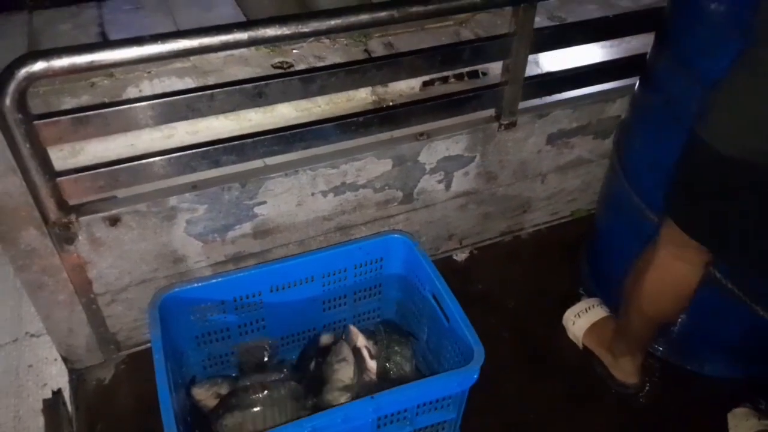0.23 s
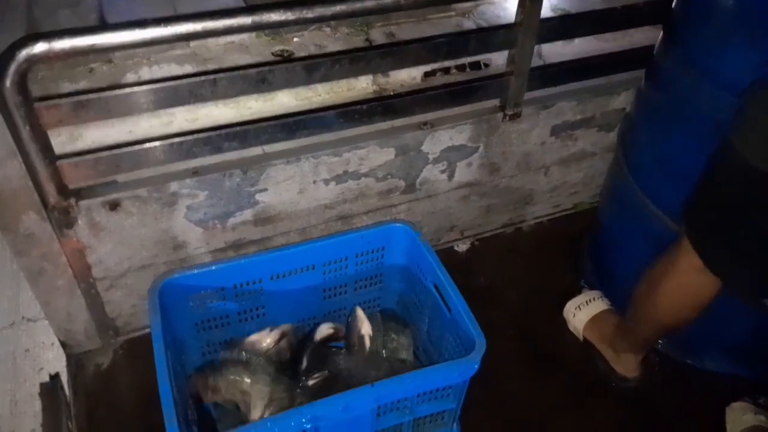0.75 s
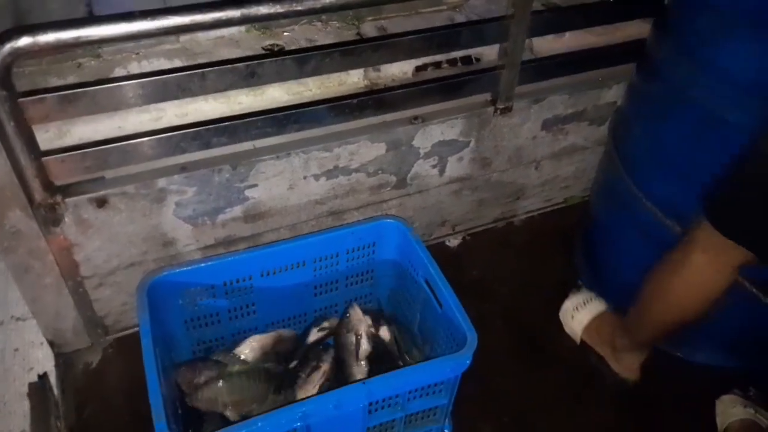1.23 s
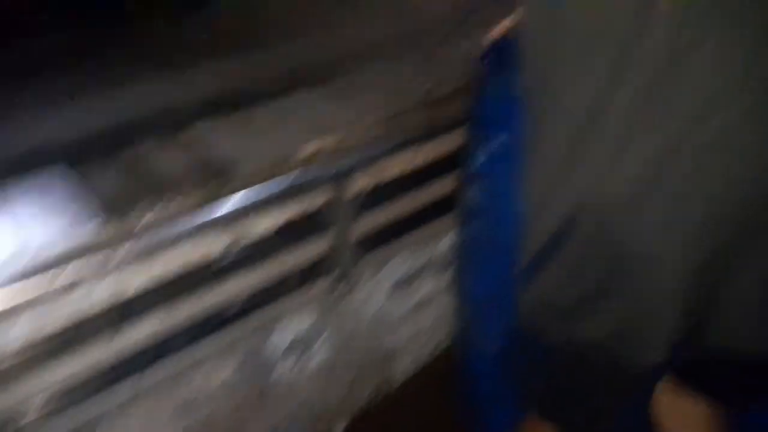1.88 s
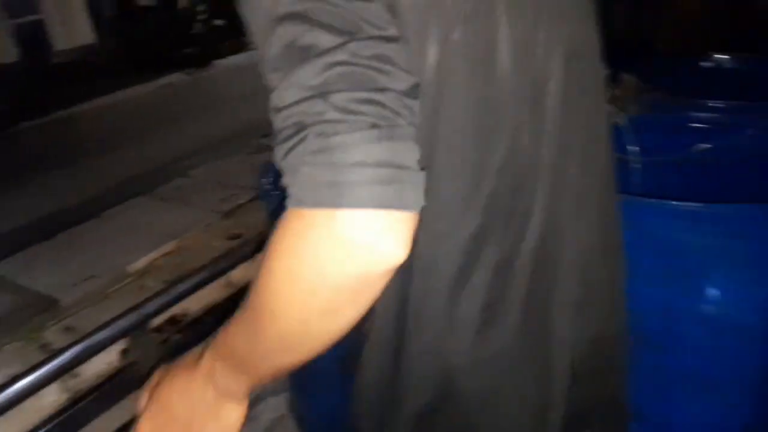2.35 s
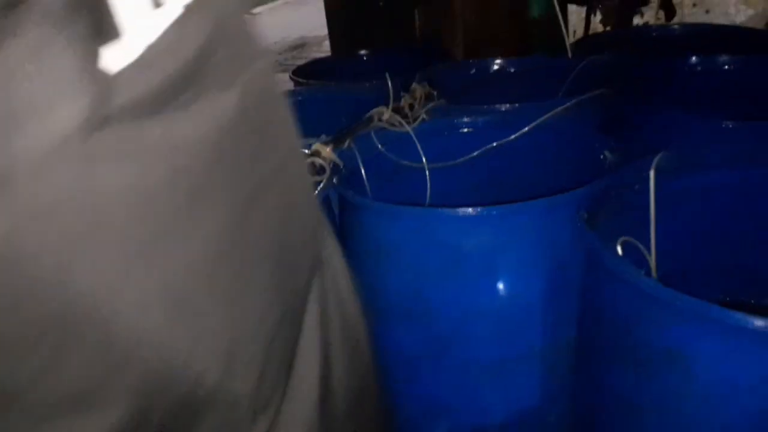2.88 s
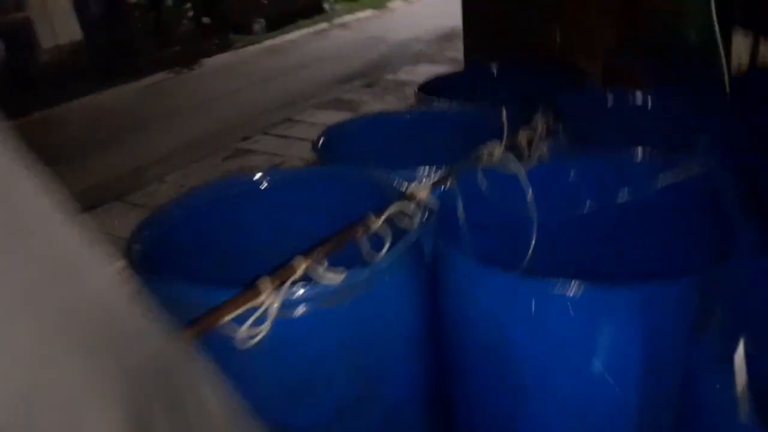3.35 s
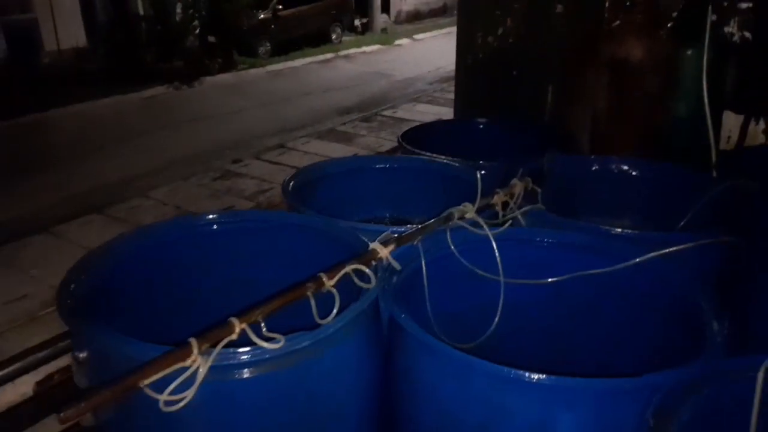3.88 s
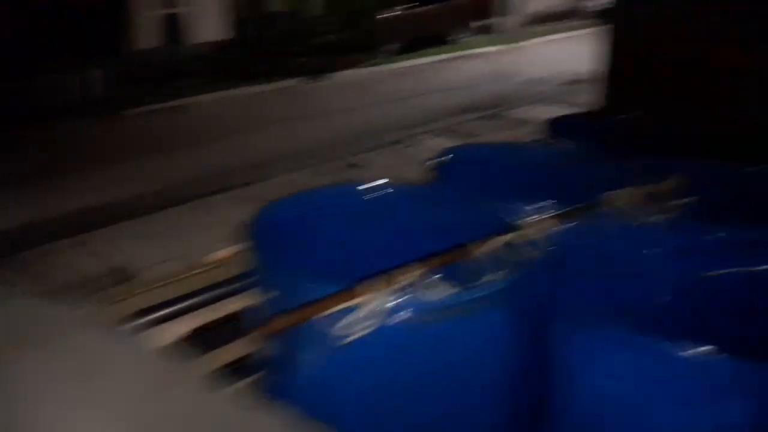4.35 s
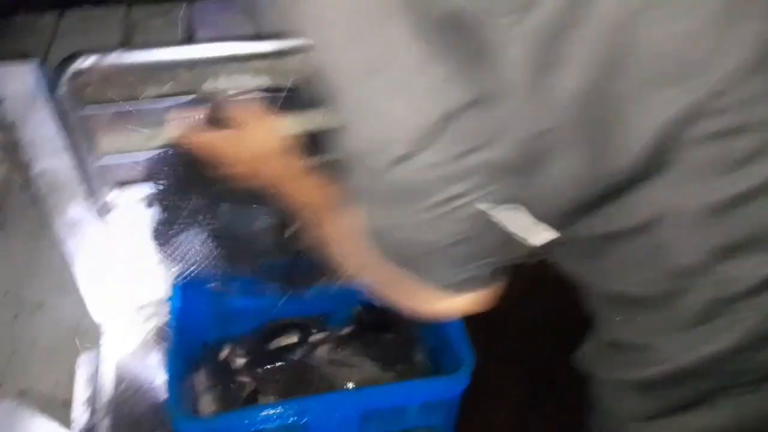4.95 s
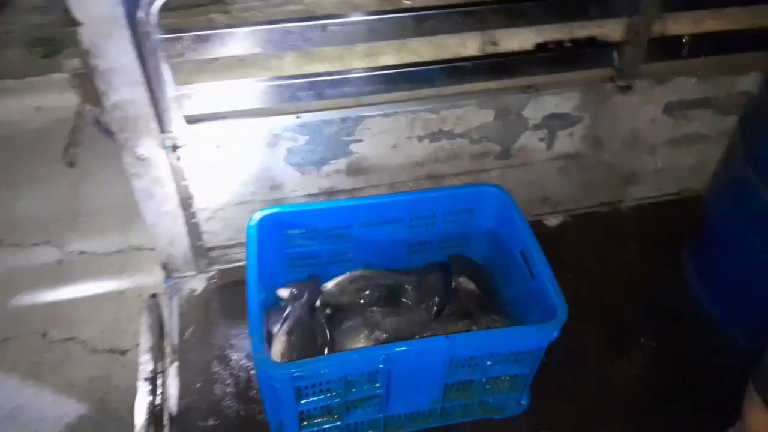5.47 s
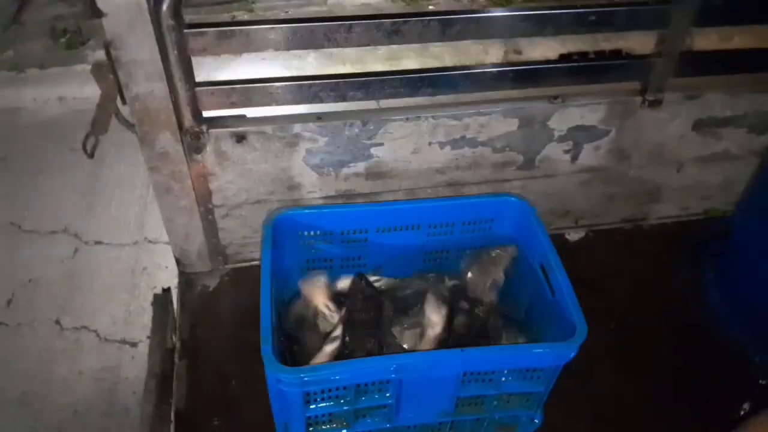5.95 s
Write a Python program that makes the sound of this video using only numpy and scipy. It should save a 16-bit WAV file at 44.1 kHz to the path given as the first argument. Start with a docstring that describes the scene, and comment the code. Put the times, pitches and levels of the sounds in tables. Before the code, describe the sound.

Close handheld stereo on a truck bed at night: fish thrash in a plastic crate with crisp wet slaps, small splashes and popping bubbles over a low engine idle. Dull thumps and one heavy drum drop follow midway. Water keeps churning and spattering, then a loud burst of slaps and splashes lands before things quieten to small wet flicks and a last flurry of snapping flaps.

```python
"""Sharp wet slaps and small splashes mingle over a truck's idle: fish flap in a crate and in water drums, at night.
Slaps and splashes are shaped noise bursts with a ringing cavity; trapped air pops as gliding sines.
Churn, patter and spray are flickering noise with bubble rings; slither is resonant friction noise.
Thumps, knocks, a drum drop and snaps ring damped modes; the idle is a sum of exhaust orders.
Coloured noise trembles the truck bed and hisses behind; a phone's two ports hear it in stereo."""
import sys
import numpy as np
from scipy import signal
from scipy.fft import rfft, irfft
from scipy.io import wavfile

SR = 44100
rng = np.random.default_rng(int(sys.argv[2]) if len(sys.argv) > 2 else 0)


def volts(x):
    """Linear amplitude factor 10**(x/20) for a level x in dB, scalar or array-like."""
    e = np.asarray(x, float) / 20
    return 10 ** e


def to_wav(s):
    """Save 16-bit WAV."""
    ch = np.atleast_2d(s).T  # columns
    pcm = np.round(np.clip(ch, -1, 1) * 32767)  # PCM
    wavfile.write(sys.argv[1], SR, pcm.astype(np.int16))


N = 274302

# Steady hiss of air hoses and street: (frequency [Hz], relative density [dB])
NIGHT_SPECTRUM = [(710, -30), (1200, -10), (1750, -10), (2560, -4), (3220, 11), (4600, -9), (7170, -1),
                  (10400, -58), (13500, -32), (16000, -23)]
# Engine idle: (time [s], firing rate [Hz], boom level [dB], hum level [dB])
IDLE = [(0, 21.58, -29, -33.5), (1, 21.63, -30.5, -28.5), (2, 21.78, -28, -28.5), (3.04, 21.69, -33, -28.5),
        (3.3, 21.73, -41, -30), (3.9, 21.68, -39.5, -37.5), (4.4, 21.85, -42, -35), (4.9, 21.78, -43, -34),
        (5.5, 21.57, -38, -29.5), (6.22, 21.88, -30.5, -32.5)]
# Exhaust orders: (multiple of the firing rate, level re hum [dB])
EXHAUST_ORDERS = [(2, -9), (2.5, -15.5), (4, -10), (4.5, -14.5), (5, -12), (5.5, -17.5), (7, -15.5),
                  (8, -18), (8.5, -21), (10, -33.5)]
# Rising and falling tremble of the bed: (time [s], level [dB])
TREMBLE = [(0.0, -25.5), (0.26, -35.5), (1.0, -28.5), (1.23, -33.5), (2.44, -40), (2.61, -34), (3.15, -41),
           (3.48, -33.5), (3.9, -36.5), (4.59, -23.5), (5.06, -27.5), (5.32, -32.5), (5.72, -35.5),
           (6.22, -28.5)]
# Colour of the bed's shaking: (frequency [Hz], relative density [dB])
SHAKE_SPECTRUM = [(18, -38), (30, -34), (48, -21.5), (70, 4.5), (104, 0), (216, -15), (262, -13.5),
                  (400, -30), (520, -50), (880, -120)]
# Thumps on the steel floor: (time [s], relative level [dB], contact [s], lowest mode [Hz])
THUMPS = [(0.862, -13, 0.0041, 110), (0.9, -20, 0.0033, 100), (0.967, -12, 0.0025, 103.5),
          (1.079, -15.5, 0.0028, 93), (1.886, -8.5, 0.0055, 92.5), (1.919, -14, 0.0058, 91.3),
          (2.413, -16.5, 0.0015, 78.6), (2.516, -13, 0.0026, 91), (2.596, -13.5, 0.0039, 83.6),
          (2.639, -14.5, 0.0039, 90), (2.691, -14, 0.0039, 80), (2.815, -14, 0.0047, 81),
          (2.84, -18, 0.0043, 88), (3.12, -16.5, 0.0018, 125.3), (3.149, -10.5, 0.0034, 72),
          (3.18, -22, 0.002, 78.7), (3.236, -16, 0.0024, 67.4), (4.128, -11, 0.0028, 110.3),
          (4.157, -18.5, 0.0029, 99.5), (4.184, -17, 0.0032, 98), (4.24, -29, 0.0047, 91),
          (4.415, -18, 0.0039, 94), (4.439, -10, 0.0042, 91), (4.468, -13, 0.0029, 98.7),
          (4.552, -22, 0.0023, 93), (4.648, -11, 0.002, 99.3), (4.716, -23, 0.0032, 97),
          (4.75, -22, 0.0011, 95), (4.931, -8.5, 0.0033, 102), (4.959, -14, 0.0025, 96),
          (5.032, -13.5, 0.0026, 90.7), (5.158, -18, 0.0044, 93), (5.204, -21.5, 0.003, 95)]
# Floor modes: (multiple of the lowest mode, mean level [dB], t60 [s])
FLOOR_MODES = [(1, -1, 0.17), (1.45, -34, 0.049), (1.9, -8, 0.2), (3.05, -18, 0.22)]
# Hollow knocks of fish on plastic walls: (time [s], relative level [dB], pitch [Hz], t60 [s])
KNOCKS = [(0.404, -11, 373, 0.042), (1.653, -15.5, 278, 0.075), (1.792, -14, 272, 0.1),
          (4.116, -13, 311, 0.054), (4.135, -14, 280, 0.075), (4.16, -24, 271.6, 0.09),
          (4.308, -17.5, 285, 0.07), (4.647, -10, 284, 0.1), (4.92, -11.5, 294, 0.064),
          (4.947, -27, 245, 0.035)]
# Crate modes: (multiple of the pitch, level [dB])
CRATE_MODES = [(1, -1), (1.3, -6.5), (1.75, -8), (2.3, -13)]
# Overtones of the dropped drum itself: (frequency [Hz], level [dB], t60 [s])
DROP_OVERTONES = [(130, -15, .28), (212, -9, .28), (244, -12, .13), (340, -24, .15)]
# Wet scales slithering in the crate: (time [s], level [dB])
SLITHER = [(5.86, -55), (5.89, -48), (5.95, -39), (6.02, -60), (6.11, -40), (6.22, -49)]
# Slither resonances: (frequency [Hz], level [dB], t60 [s])
SLITHER_RINGS = [(2750, 0, 0.0062), (7500, -1, 0.004)]
# The water's stir: (time [s], churn level [dB], patter level [dB], fine spray level [dB])
STIR = [(0.0, -39.5, -45.5, -53), (0.48, -40, -50.5, -50.5), (0.76, -38, -52, -46.5),
        (1.09, -38, -35.5, -47.5), (1.33, -35.5, -47.5, -45.5), (1.4, -41.5, -47.5, -58),
        (1.53, -35.5, -45, -46), (1.56, -40, -40.5, -47), (1.77, -36.5, -43, -48),
        (2.04, -37.5, -44.5, -48), (2.2, -35, -45.5, -52), (2.75, -34, -33.5, -42.5),
        (3.12, -38, -36.5, -47.5), (3.53, -39.5, -43.5, -39), (3.7, -41, -46, -40), (3.83, -41, -45, -42.5),
        (4.05, -39, -43.5, -46.5), (4.45, -38.5, -37.5, -42), (4.68, -33, -39.5, -38),
        (4.78, -31.5, -40, -31.5), (4.94, -31, -36.5, -40.5), (5.16, -37, -41, -43.5),
        (5.37, -44, -52, -56), (5.67, -41, -53, -55), (5.86, -42.5, -49.5, -63), (5.9, -43.5, -41, -49),
        (6.12, -34.5, -44, -39.5), (6.22, -39.5, -46, -42)]
# Colour of churning water: (frequency [Hz], relative density [dB])
CHURN_SPECTRUM = [(120, -32), (200, -0.5), (327, -7.5), (551, -7), (1120, -12), (1360, -17.5), (2200, -19),
                  (2860, -21.5), (4840, -120)]
# Colour of spray: (frequency [Hz], relative density [dB])
SPRAY_SPECTRUM = [(820, 3), (1400, -2), (1580, -6), (1770, -4.5), (2080, -3.5), (2380, 2), (4210, -6.5),
                  (7600, -2.5), (9130, -10), (10000, -9.5), (13700, -9), (15700, -8.5), (16300, -82)]
# Air pockets that pop: (time [s], level [dB], starting pitch [Hz], t60 [s])
POPS = [(0.043, -30, 1180, .03), (0.085, -25, 860, 0.03), (0.105, -40, 890, 0.033), (0.133, -33, 2460, .03),
        (0.512, -21, 3890, .025), (0.704, -29, 1140, 0.033), (0.729, -24.5, 2430, 0.019),
        (0.789, -25, 2340, .025), (0.789, -24, 3400, 0.018), (0.956, -16.5, 1004, 0.024),
        (1.064, -24, 846, .04), (0.922, -27, 2660, .018), (1.043, -24, 2490, 0.02), (1.059, -28, 2830, .03),
        (1.112, -27, 2700, 0.044), (1.118, -23, 2560, .04), (1.226, -23, 2600, .025),
        (1.226, -26, 935, 0.038), (1.277, -22, 2750, 0.022), (1.2765, -19, 3530, 0.024),
        (1.569, -19, 700, 0.023), (1.569, -26.5, 2560, .02), (1.651, -22, 630, .025),
        (1.683, -28, 2550, .03), (1.659, -26, 2360, 0.033), (2.146, -17, 3310, 0.036),
        (2.526, -23, 2100, .025), (2.537, -13.5, 1250, 0.02), (2.612, -15.5, 3450, 0.03),
        (2.653, -24, 1110, .04), (2.668, -19.5, 3630, 0.025), (2.753, -27, 3000, 0.042),
        (2.797, -23.5, 735, 0.041), (3.263, -34, 3000, 0.032), (3.414, -27, 2770, 0.053),
        (4.165, -20, 1420, 0.024), (4.264, -26, 1510, .03), (4.559, -17, 4630, 0.032),
        (4.664, -30, 7100, .03), (4.666, -31, 2510, .04), (4.76, -35, 2720, .03), (4.781, -28, 2750, .02),
        (4.811, -6, 2470, 0.022), (4.81, -14, 3000, .02), (4.812, -14.5, 1760, 0.033),
        (4.812, -21, 770, 0.036), (4.862, -26, 690, 0.061), (4.878, -23, 735, .05), (4.905, -25, 670, .05),
        (4.911, -24, 2750, 0.023), (4.925, -26, 820, 0.065), (5.07, -29, 640, .04), (5.138, -27, 490, .04),
        (4.857, -26, 1170, 0.027), (4.88, -20, 1224, .03), (4.884, -27, 3420, .02),
        (4.903, -25, 2760, 0.042), (4.922, -18, 1590, 0.022), (4.947, -28, 776, 0.058),
        (5.012, -21, 1150, 0.042), (5.604, -37, 2500, 0.036), (5.703, -36, 6760, 0.026),
        (5.853, -35, 3000, 0.02), (5.899, -29, 2810, .03), (5.942, -24, 7500, .03),
        (6.061, -18.5, 4050, 0.025), (6.161, -35, 3050, .025), (6.114, -25, 7500, .03)]
# Dry snaps at the start of some slaps and a splash: (time [s], level [dB])
SNAPS = [(0.2567, -8), (0.9213, -10), (1.2746, -16), (1.6586, -13), (2.1475, -12), (2.83, -14),
         (3.906, -16), (4.8095, -10), (5.2105, -11), (6.1589, -16), (6.1788, -9), (6.2028, -11)]
# Snap modes: (frequency [Hz], level [dB], t60 [s])
SNAP_MODES = [(3000, -18, 0.0011), (7500, -8, 0.0019), (12100, -9, .0015)]
# Sharp wet slaps: (time [s], level [dB], hiss re level [dB], cavity pitch [Hz], decay [s])
SLAPS = [(0.2573, -20, 2, 5850, 0.047), (0.435, -39, 1.5, 1210, 0.042), (0.7277, -18, -37, 1430, 0.14),
         (0.7872, -19, -9, 2640, 0.06), (0.9212, -32, 9, 9400, 0.036), (0.9549, -18.5, -13, 1080, 0.077),
         (1.041, -19, -4.5, 2580, 0.055), (1.129, -23.5, 0, 2470, 0.035), (1.1476, -34, 0, 1150, 0.085),
         (1.225, -18, -7, 1090, 0.061), (1.275, -23, 0.5, 3380, 0.041), (1.475, -40, 1, 6940, 0.03),
         (1.5687, -24.5, -0.5, 835, 0.088), (1.636, -18.5, -6.5, 1080, 0.046),
         (1.6597, -20, -1, 2610, 0.029), (1.682, -27.5, 1, 2750, 0.071), (1.7913, -24.5, -2.5, 1060, 0.037),
         (2.147, -16, -2.5, 3840, 0.052), (2.2487, -35.5, 2, 970, 0.049),
         (2.6125, -23.5, -5.5, 3900, 0.036), (2.639, -35, 6, 1140, 0.026), (2.72, -29, -5, 1950, 0.04),
         (3.1876, -28.5, 0.5, 5030, 0.046), (3.261, -21.5, -11, 3040, 0.04), (3.391, -25, -9, 3100, 0.047),
         (3.4113, -21.5, -5.5, 2960, 0.097), (3.48, -21.5, -8, 4880, 0.27), (3.906, -33, 8, 6000, 0.085),
         (4.0357, -25.5, -1.5, 2670, 0.31), (4.162, -18, -5, 2860, 0.05), (4.2658, -30.5, 5.5, 1470, 0.027),
         (4.5592, -21, 0, 5100, 0.081), (4.7019, -18.5, 0, 2440, 0.051), (4.781, -19, 5, 10400, 0.053),
         (4.8093, -5.5, -12.5, 2430, 0.033), (4.948, -15, -8.5, 1170, 0.096),
         (5.2098, -18.5, -3, 5630, 0.045), (5.3573, -39, 5, 8350, 0.043), (5.413, -37, -9, 3000, 0.036),
         (5.437, -44, -2, 7500, 0.032), (5.46, -40, 0.5, 9600, 0.042), (5.515, -49, 2, 7500, 0.026),
         (5.6065, -29, -13, 2760, 0.053), (5.636, -42.5, 0, 6900, 0.03), (5.677, -53, 0, 9500, 0.03),
         (5.709, -47, 1, 9500, 0.026), (5.853, -48, -2, 9480, 0.024), (5.9874, -23, 0.5, 4900, 0.056),
         (6.06, -23, -0.5, 4300, 0.049), (6.159, -27.5, 7, 5500, 0.042), (6.177, -23, 5.5, 8200, 0.054),
         (6.2027, -15, 1, 8100, 0.031)]
# Sloppy splashes that swell first: (time [s], level [dB], hiss re level [dB], cavity pitch [Hz], decay [s])
SPLASHES = [(0.04, -24.5, -15, 1230, 0.096), (0.082, -34, -16, 830, 0.05), (0.103, -29, -13, 900, 0.065),
            (0.137, -35, -4, 2400, 0.041), (0.508, -21.5, -8.5, 2490, 0.058), (0.59, -35.5, 0.5, 835, 0.16),
            (0.455, -41, -1, 7500, 0.049), (0.681, -32.5, -4, 4530, 0.032), (0.7036, -29, -37, 1100, 0.03),
            (0.763, -38.5, 0, 6500, 0.097), (0.842, -34, -7, 8250, 0.05), (0.892, -36, 3, 929, 0.024),
            (0.998, -29.5, -7, 1050, 0.11), (1.064, -24, -15, 930, 0.074), (1.03, -32, -17, 1000, .05),
            (1.078, -31, -6, 2800, 0.06), (1.108, -26.5, -13, 2790, 0.14), (1.178, -33, -7, 6950, 0.045),
            (1.26, -46, -4, 7040, 0.038), (1.581, -38, -2, 7000, 0.026), (1.596, -34, 2, 2500, 0.044),
            (1.6146, -29.5, 0, 5500, 0.06), (1.75, -36, 1.5, 1027, 0.061), (1.817, -38, 1, 5500, 0.025),
            (1.846, -36.5, 1.5, 4500, 0.03), (1.879, -34, -2, 1050, 0.061), (1.896, -28, -8, 2430, 0.04),
            (1.912, -29, -9, 2920, 0.057), (1.951, -30.5, -2.5, 990, 0.14), (1.996, -37, 2, 930, 0.029),
            (2.275, -27.5, -31, 1670, 0.052), (2.332, -37, -2.5, 5060, 0.041),
            (2.372, -32.5, -4, 5540, 0.031), (2.456, -35, -5, 2300, 0.05), (2.521, -20, -20, 2130, 0.18),
            (2.532, -26, -5, 5130, 0.048), (2.6526, -47, -22, 1140, 0.032), (2.6693, -23, -2, 3900, 0.038),
            (2.7754, -30, 1, 990, 0.064), (2.799, -34, -8, 5040, 0.044), (2.81, -32, 7.5, 5600, 0.053),
            (2.827, -27.5, -1.5, 5800, 0.26), (2.883, -22, -11, 1130, 0.2), (3.069, -24, -12, 1050, 0.065),
            (3.152, -27.5, -3.5, 3330, 0.083), (3.11, -32, -7, 5000, 0.031),
            (3.286, -34.5, -16, 2200, 0.029), (3.314, -52, -5, 5200, 0.023), (3.346, -33, -23, 980, 0.04),
            (3.443, -34, -7, 5330, 0.029), (3.5444, -30, -12, 5430, 0.27), (3.568, -30.5, -4, 880, 0.09),
            (3.648, -36, -7, 4020, 0.029), (3.673, -38.5, 6.5, 5630, 0.044), (3.746, -35, -6, 4500, 0.031),
            (3.835, -36.5, 0, 7790, 0.063), (4.098, -33.5, -3.5, 6170, 0.17),
            (3.922, -25, -25, 2070, 0.037), (4.185, -34, 3.5, 6500, 0.042), (4.343, -36, 2, 6460, 0.019),
            (4.447, -33, -1, 6500, 0.14), (4.471, -30, -3, 2500, 0.054), (4.801, -29, -17, 2500, 0.045),
            (4.3129, -26.5, -8, 2900, 0.029), (4.372, -27.5, -21, 1110, 0.094),
            (4.4934, -28, -0.5, 895, 0.13), (4.526, -27.5, 1, 4900, 0.08), (4.599, -26.5, 0, 900, 0.049),
            (4.622, -24, -5.5, 2360, 0.19), (4.661, -30, 4.5, 2530, 0.052), (4.7376, -31, 3, 5100, 0.042),
            (4.759, -19.5, -8, 2660, 0.089), (4.824, -17.5, -5, 2700, 0.035),
            (4.8577, -14, -6, 1240, 0.051), (4.8804, -23.5, 3, 1240, 0.044), (4.886, -23, -2, 5530, 0.043),
            (4.9028, -15.5, -12, 2750, 0.064), (4.919, -20.5, -9, 890, 0.061),
            (4.927, -20.5, -6.5, 1830, 0.062), (5.0, -30, -12, 2500, .05), (5.011, -23.5, -16, 1720, 0.062),
            (5.095, -28, -7, 1053, 0.24), (5.134, -30, -26, 860, 0.078), (5.176, -31, -2, 900, 0.04),
            (5.241, -30.5, -5, 2880, 0.079), (5.281, -27, -9.5, 1155, 0.036),
            (5.309, -33.5, -2.5, 3000, 0.12), (5.895, -38, -28, 2899, 0.13), (5.9367, -32, 0, 2900, 0.056),
            (6.039, -30, 0, 4120, 0.034), (6.103, -30.5, -4, 3050, 0.074)]
# Likeness of the two ports: (frequency [Hz], left-right correlation)
LIKENESS = [(60, .995), (180, .98), (500, .85), (1000, .65), (2500, .45), (6000, .2), (15000, .1)]
# Balance of the two ports: (frequency [Hz], left over right [dB])
LEFT_LEAD = [(60, 2), (150, 0), (380, 0.5), (950, 6), (2380, -2.5), (5980, -1), (15000, -1.0)]
# The phone turns: (time [s], lead of the left port [ms])
FACING = [(0, 0.097), (1.6, 0.1), (2.3, 0.19), (4.3, 0.21), (4.6, .06), (6.22, 0.039)]

THROWN_RISE_S, THROWN_T60_S = 0.0026, 0.067


def rms_one(x):
    return x / np.sqrt(np.mean(x ** 2) + 1e-20)


def in_time(rows):
    """Each column after the time, interpolated to every sample."""
    s, *columns = np.transpose(rows)
    return [np.interp(np.arange(N) / SR, s, c) for c in columns]


def at_hz(points, hz):
    """Table value, linear over log frequency."""
    points_hz, values = np.array(points).T
    return np.interp(np.log(hz), np.log(points_hz + 1e-9), values)


def drift(corner_hz):
    """Slow random wander of rms 1: noise at SR/40 through two equal one-pole low-passes."""
    r = np.exp(-80 * np.pi * corner_hz / SR)
    noise = rng.standard_normal(N // 40 + 2002)
    slow = signal.lfilter([1], [1, -2 * r, r * r], noise)[2000:]
    return np.interp(np.arange(N) / 40, np.arange(len(slow)), rms_one(slow))


def ring(x, hz, t60_s):
    """Two-pole resonator: a unit click starts a decaying sine of height 1."""
    r, w = volts(-60 / (t60_s * SR)), 2 * np.pi * hz / SR
    return signal.lfilter([0, np.sin(w)], [1, -2 * r * np.cos(w), r * r], x + 1e-18)


def blow(s, db, contact_s, modes):
    """A Hann push, contact_s wide at half height, rings modes of (Hz, dB, t60 s) from time s."""
    out, at = np.zeros(N), round(s * SR)
    shape = np.hanning(max(int(2 * contact_s * SR), 4))
    push = np.zeros(min(SR // 2, N - at))
    push[:len(shape)] = volts(db) * shape / shape.sum()
    out[at:at + len(push)] = sum(volts(level_db) * ring(push, hz, t60_s) for hz, level_db, t60_s in modes)
    return out


def swell(events, rise_s, t60_s):
    """Envelope in which each event (s, dB) swells and dies; powers add."""
    s, db = np.transpose(events)
    marks = np.zeros(N)
    np.add.at(marks, (s * SR).astype(int), volts(2 * db))
    fall, rise = volts(-120 / (t60_s * SR)), np.exp(-1 / (rise_s * SR))
    power = signal.lfilter([1 - rise], np.convolve([1, -fall], [1, -rise]), marks + 1e-18)
    return np.sqrt(power)


def stereo_noise(spectrum):
    """Coloured noise, ports alike in the bass and apart in the treble; mid rms 1."""
    hz = np.maximum(np.arange(N // 2 + 1) * SR / N, 1)
    mid, side = rfft(rng.standard_normal((2, N))) * volts(at_hz(spectrum, hz))
    alike = np.clip(at_hz(LIKENESS, hz), -1, 1)
    pair = np.sqrt(1 + alike) * mid + np.sqrt(1 - alike) * side * [[1], [-1]]
    pair = irfft(pair * volts(at_hz(LEFT_LEAD, hz) * [[.5], [-.5]]), N)
    return pair / np.std(pair.mean(axis=0))


def band(x, low_hz, high_hz):
    return signal.sosfilt(signal.butter(2, [low_hz, high_hz], "band", fs=SR, output="sos"), x)


def night():
    """Steady broadband hiss of air hoses and street."""
    return volts(-58.5) * stereo_noise(NIGHT_SPECTRUM)


def engine():
    """Exhaust orders: sines at multiples of the firing rate, wavering in level and phase."""
    firing_hz, boom_db, hum_db = in_time(IDLE)
    turn = 2 * np.pi * np.cumsum(firing_hz) / SR
    orders = [(3, boom_db)]  # the pipe booms on the third multiple
    orders += [(k, hum_db + db) for k, db in EXHAUST_ORDERS]
    out = np.zeros(N)
    for k, db in orders:
        level = volts(db + 1.6 * drift(3.7))
        out += level * np.sin(k * turn + 0.5 * drift(1.0) + rng.uniform(0, 2 * np.pi))
    return np.sqrt(2) * out


def shaking():
    """Low noise of the trembling bed; every thump and knock adds a brief jolt."""
    jolts = swell([row[:2] for row in THUMPS + KNOCKS], rise_s=0.014, t60_s=0.15)
    level = np.hypot(volts(in_time(TREMBLE)[0]), volts(-17) * jolts)
    return level * volts(2.0 * drift(14.5)) * stereo_noise(SHAKE_SPECTRUM)


def thumps():
    """Feet and water-filled drums push the steel floor, ringing its modes."""
    spread_db = rng.normal(0, 1.0, (len(THUMPS), len(FLOOR_MODES)))
    out = np.zeros(N)
    for (s, db, contact_s, hz), own_db in zip(THUMPS, spread_db):
        modes = [(hz * k, level_db + g_db, t60_s) for (k, level_db, t60_s), g_db in zip(FLOOR_MODES, own_db)]
        out += blow(s, db + 0.5, contact_s, modes)
    return out


def knocks():
    """Fish strike the plastic walls, ringing the hollow crate's modes."""
    return sum(blow(s, db - 7.5, 0.00061, [(hz * k, level_db, t60_s) for k, level_db in CRATE_MODES])
               for s, db, hz, t60_s in KNOCKS)


def drum_drop():
    """A full drum set down hard: its note starts high, sags and settles, with overtones."""
    start_s, settled_hz, sag_hz, sag_s = 3.0515, 68.1, 30.5, 0.011
    u = np.maximum(np.arange(N) / SR - start_s, 0)
    turns = settled_hz * u + sag_hz * sag_s * (1 - np.exp(-u / sag_s))
    level = volts(2.5 - 60 * u / 0.21) * (1 - np.exp(-u / 0.0018))  # t60 0.21 s, rise 1.8 ms
    return -level * np.sin(2 * np.pi * turns) + blow(start_s, 0, 0.0015, DROP_OVERTONES)


def slither():
    """Wet scales rub: lumpy friction noise through two broad resonances."""
    rub = rng.standard_normal((2, N)) * volts(4.7 * drift(38))
    rings = sum(volts(db) * rms_one(ring(rub, hz, t60_s)) for hz, db, t60_s in SLITHER_RINGS)
    return volts(in_time(SLITHER)[0]) * rms_one(rings)


def droplets(per_s, t60_s):
    """Envelope of small random splats that swell for a moment and die quickly; rms 1."""
    born = rng.random(N) < per_s * volts(3.0 * drift(5)) / SR
    sizes = volts(4 * np.minimum(rng.exponential(1, N), 3)) * born
    r = volts(-60 / (t60_s * SR))
    return rms_one(signal.lfilter([1], [1, -2 * r, r * r], sizes))


def bubbles(per_s, low_hz, high_hz, cycles, spread_db):
    """Drops trap air that rings, in clumps, each a little left or right; t60 is cycles / pitch."""
    born = rng.random(N) < per_s * volts(4.0 * drift(12)) / SR
    sizes = volts(spread_db * np.minimum(rng.exponential(1, N), 4)) * rng.choice([-1, 1], N) * born
    dealt, pitches_hz = rng.integers(0, 16, N), np.geomspace(low_hz, high_hz, 16)
    sides = sizes * volts(rng.normal(0, 3, N) * [[1], [-1]])
    return rms_one(sum(ring(sides * (dealt == k), hz, cycles / hz) for k, hz in enumerate(pitches_hz)))


def water():
    """Churn below, patter and spray above; all flicker, splat together and rise after each slap or splash."""
    churn_db, patter_db, spray_db = in_time(STIR)
    events = SLAPS + SPLASHES
    thrown = swell([row[:2] for row in events], THROWN_RISE_S, THROWN_T60_S)
    misted = swell([(s, db + hiss_db) for s, db, hiss_db, *_ in events], THROWN_RISE_S, THROWN_T60_S)
    splats, lumps = droplets(73, t60_s=0.014), drift(15.8)

    churn = volts(1.0 * drift(34.0)) * stereo_noise(CHURN_SPECTRUM) * (0.65 + 0.035 * splats)
    churn = churn + volts(-10.0) * bubbles(200, 460, 1700, cycles=4.8, spread_db=3.0)

    patter = rms_one(band(stereo_noise(SPRAY_SPECTRUM), 1190, 5600)) * (0.52 + 0.27 * splats)
    patter = patter + volts(-17.5) * bubbles(250, 1940, 3830, cycles=35.0, spread_db=6.0)
    # lone droplets tick out of the patter
    patter = patter + volts(-10) * bubbles(140, 1800, 8000, cycles=7, spread_db=3.5)

    spray = rms_one(band(stereo_noise(SPRAY_SPECTRUM), 3200, 21000)) * (0.81 + 0.5 * splats)

    churn = churn * np.hypot(volts(churn_db), volts(-45) * thrown)
    patter = patter * np.hypot(volts(patter_db), volts(-12) * thrown)
    spray = spray * np.hypot(volts(spray_db), volts(-32) * misted)
    return volts(1.93 * lumps) * churn + volts(0.94 * lumps) * (patter + spray)


def pops():
    """Trapped air rings a dying note that climbs as the pocket nears the surface, a little left or right."""
    rise_s, glide_per_s = 0.00037, 4
    out, u = np.zeros((2, N + SR)), np.arange(round(.06 * SR)) / SR
    for (s, db, hz, t60_s), (turn, side) in zip(POPS, rng.random((len(POPS), 2))):
        note = np.sin(2 * np.pi * (turn + hz * (u + glide_per_s * u ** 2 / 2)))
        note *= volts(db - 60 * u / max(t60_s, .008)) * (1 - np.exp(-u / rise_s))
        at = round(s * SR)
        out[:, at:at + len(u)] += note * volts((6 * side - 3.5) * np.array([[1], [-1]]))
    return out[:, :N]


def snaps():
    """A click rings three very short resonances."""
    return sum(blow(s, db, 0, SNAP_MODES) for s, db in SNAPS)


def flicks():
    """Rows like the slaps, born at random; their level follows the patter."""
    per_s = 3
    draw = rng.random((round(3 * per_s * N / SR), 5))
    s = np.cumsum(-np.log(1 - draw[:, 0]) / per_s)
    patter_db = np.interp(s, *np.transpose(STIR)[[0, 2]])
    db = patter_db + 5 + 4 * (2 * draw[:, 1] - 1)
    hiss_db, hz = -14 + 16 * draw[:, 2], 900 * volts(17.0 * draw[:, 3])
    decay_s = 0.039 + 0.03 * draw[:, 4]
    rows = np.transpose([s, db, hiss_db, hz, decay_s])
    return rows[s < N / SR - .01]


def burst_shape(u, rise_s, decay_s):
    """Peak-1 envelope: a crack dies in 0.4 of the decay while a weaker tail goes on."""
    rise = (1 - np.exp(-u / rise_s)) ** 2
    shape = rise * (volts(-7 - 60 * u / decay_s) + volts(6 - 60 * u / (0.4 * decay_s)))
    return shape / shape.max()


def part_levels_db(hiss_db, hz):
    """Levels of body, smack, sheen and hiss re the burst: low pitches carry more body."""
    body_db = max(-7 - 10.5 * np.log2(hz / 1000), -14)
    fade_db = min(hiss_db, 0)
    smack_db = -8.5 + 0.75 * fade_db * (hz < 1500)  # low plops lose smack along with their hiss
    return np.array([body_db, smack_db, -11 + fade_db, hiss_db])


def slaps():
    """Slaps, flicks and splashes: four noise parts burst together and ring a trapped pocket of air."""
    body = stereo_noise([(250, 0.0), (500, -1.5), (1000, 0.5), (1600, 4.5), (3000, -2), (7000, -54)])
    smack = stereo_noise([(1000, -7.0), (1500, -8.5), (2100, -6.0), (2700, 2.0), (3300, 2.0), (5000, -13)])
    sheen = stereo_noise([(2200, -10), (3300, -4.5), (4500, 3.5), (6500, -11.5), (11000, -27)])
    hiss = band(stereo_noise(SPRAY_SPECTRUM), 4900, 15200)
    parts = np.array([body, smack, sheen, hiss])
    # the sheet of water tears unevenly
    parts *= volts(2.4 * drift(170) + 1.8 * np.array([drift(120) for _ in parts])[:, None])

    slap_rise_s, splash_rise_s, splash_lead_s = 0.00056, 0.0042, 0.0031
    rows = [(slap_rise_s, *row) for row in [*SLAPS, *flicks()]]
    rows += [(splash_rise_s, s - splash_lead_s, *row) for s, *row in SPLASHES]
    out, t = np.zeros((2, N)), np.arange(round(.15 * SR)) / SR
    for rise_s, s, db, hiss_db, hz, decay_s in rows:
        span = slice(round(s * SR), min(round(s * SR) + len(t), N))
        shape = burst_shape(t[:span.stop - span.start], rise_s, max(decay_s, .008))
        bursts = parts[:, :, span] * shape
        # every part gets the energy of its envelope
        bursts /= np.sqrt(np.sum(bursts ** 2, axis=(1, 2), keepdims=True) / np.sum(2 * shape ** 2))
        core = volts(db) * np.tensordot(volts(part_levels_db(hiss_db, hz)), bursts, 1)
        cavity = volts(-4.5) * np.sqrt(hz / SR) * ring(core, hz, 8.3 / hz)
        out[:, span] += core + cavity
    return out


def scene():
    """Low layers lean slightly left; the right port hears the rest later, as the phone faces."""
    low = (engine() + thumps() + knocks() + drum_drop()) * volts([[.4], [-.4]]) + shaking()
    left, right = night() + slither() + water() + pops() + snaps() + slaps()
    delay_samples = np.round(in_time(FACING)[0] * SR / 1000)
    late = np.interp(np.arange(N) - delay_samples, np.arange(N), right)
    return low + np.array([left, late])


def roll_off(x):
    """The treble ends steeply here."""
    return signal.sosfilt(signal.butter(12, 16990, fs=SR, output="sos"), x)


def record(dry):
    """The microphone cuts the deep bass; the preamp rounds peaks and cuts the top."""
    x = signal.sosfilt(signal.butter(8, 43, "high", fs=SR, output="sos"), dry)
    x = 1.3 * np.tanh(x / 1.3)
    x = signal.sosfilt(signal.cheby2(10, 60, 17200, fs=SR, output="sos"), x)
    return roll_off(x)


dry = scene()
out = record(dry)
to_wav(out)
```